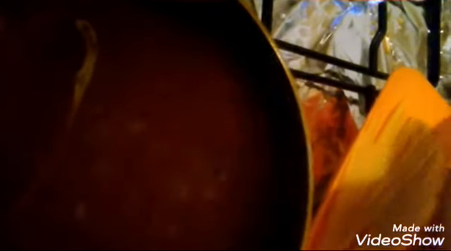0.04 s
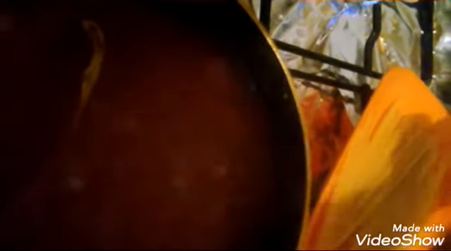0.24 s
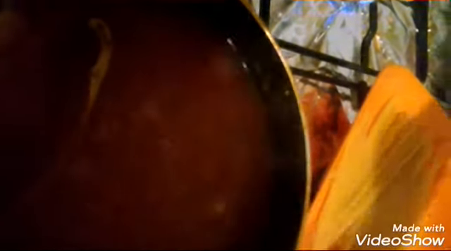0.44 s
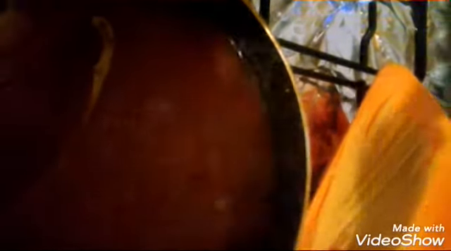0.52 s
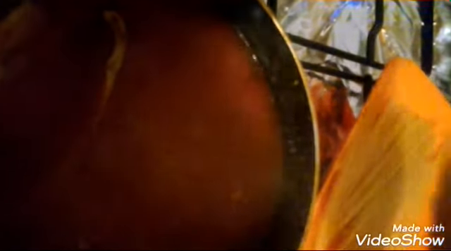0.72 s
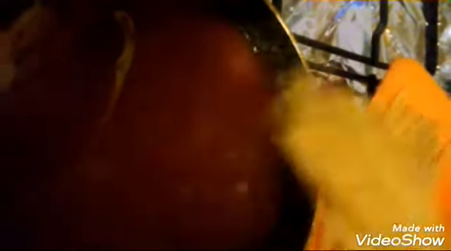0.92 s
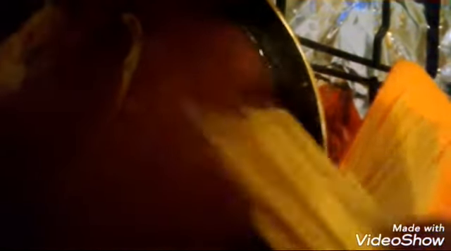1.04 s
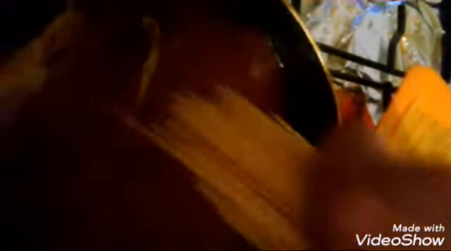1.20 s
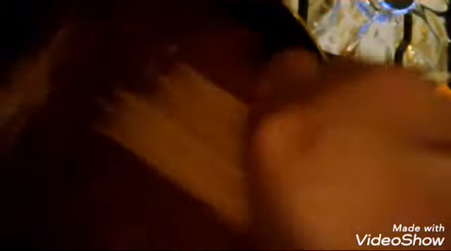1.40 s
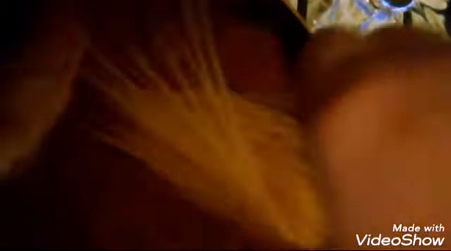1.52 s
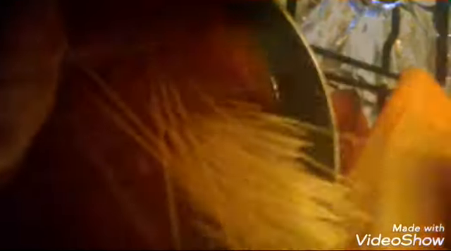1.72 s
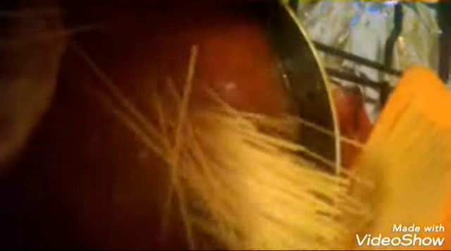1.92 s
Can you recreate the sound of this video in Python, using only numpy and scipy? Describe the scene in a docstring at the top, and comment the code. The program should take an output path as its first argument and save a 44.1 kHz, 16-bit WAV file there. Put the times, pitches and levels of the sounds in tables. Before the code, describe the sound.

Brittle cracks of dry spaghetti, then a sliding rustle, close up in a small kitchen.

```python
"""Dry spaghetti crackles in a few sharp bursts, close to a stereo pair of microphones beside a pot
on the stove in a small, hard-walled kitchen. The bundle then slides from its packet with a swelling
stick-slip rustle, and single strands tick against each other. Each click rings a strand and bounces
off the pot, the hob and the walls. Behind it all the stove hisses and hums faintly."""
import sys
import numpy as np
from scipy import signal
from scipy.fft import rfft, irfft
from scipy.io import wavfile
from scipy.ndimage import uniform_filter1d

SR = 44100
rng = np.random.default_rng(int(sys.argv[2]) if len(sys.argv) > 2 else 0)


def int16_out(signal):
    """Quantize to a 16-bit WAV file."""
    q = np.round(np.clip(np.atleast_2d(signal).T, -1, 1) * 32767)
    wavfile.write(sys.argv[1], SR, q.astype(np.int16))


N = 85995
T = np.arange(N) / SR

# Bursts of brittle cracks: start_s, crack_db, fade_s (to 1/e), crunch_db, knock_db, pan_db (+ is left)
CRACKLES = [(0.176, -62.5, .001, -87, -72, 3), (0.2083, -25.5, 0.0086, -34.5, -56.5, -4.5),
            (0.217, -28, 0.025, -43.5, -53.5, 1), (0.4113, -50, 0.0025, -59.5, -58, -3),
            (0.501, -40.5, .004, -61, -73, -4), (0.5106, -34.5, 0.0069, -64, -70, -4.5),
            (0.5157, -34, 0.045, -48, -55, 1.5), (0.5771, -36, 0.00094, -46, -43, -1),
            (.587, -27.5, 0.006, -57, -46, -4.5), (0.6003, -28, 0.023, -41.5, -47.5, 1),
            (0.6663, -42, 0.0022, -49.5, -56.5, 2.5)]
# The bundle sliding out: time_s, rustle_db, rattle_db
SLIDE_LEVELS = [(1.34, -65.5, -81), (1.385, -55.5, -64), (1.41, -52.5, -76), (1.465, -46.5, -65),
                (1.51, -39, -48.5), (1.53, -38, -51.5), (1.555, -36, -45.5), (1.605, -32, -52),
                (1.63, -51.5, -54.5), (1.70, -57, -61), (1.76, -52, -65.5), (1.805, -55.5, -64),
                (1.84, -74, -78), (1.94, -75, -79)]
# Single strands tapping: start_s, level_db, pitch_hz, knock_db, pan_db
TICKS = [(1.281, -55, 5670, -83, 0), (1.3932, -42, 5100, -78, 4), (1.509, -44, 5170, -51, -2),
         (1.5402, -37, 5060, -53, 3), (1.5495, -47, 5000, -46, -1), (1.568, -32.5, 5400, -53, 5),
         (1.592, -32, 5700, -74, 2), (1.5976, -33, 5520, -49.5, 5), (1.6075, -36.5, 5500, -46.5, 0),
         (1.675, -42, 5200, -80, -2)]
# Light bumps that leave something ringing: start_s, level_db, pitch_hz, unused, pan_db
BUMPS = [(0.4134, -47.5, 1375, -6, -6.5), (0.5762, -50, 983, 2, -1), (0.595, -53.5, 974, 2, -28),
         (1.512, -48.5, 900, 2, -6), (1.547, -42, 850, .06, -9), (1.556, -67, 231, -1, 0),
         (1.686, -68, 350, 8, 6), (1.6922, -44, 1780, 0.27, -4)]
# Two swells of a hollow resonance: time_s, level_db
HOLLOW_LEVELS = [(1.22, -91), (1.34, -71.5), (1.43, -73.5), (1.49, -89), (1.68, -79), (1.75, -63.5),
                 (1.82, -67), (1.92, -84.5)]
# The drift of the stove's hiss: time_s, level_db
STOVE_LEVELS = [(0, -63), (.4, -59), (.8, -61), (.92, -62.5), (1.13, -59.5), (1.3, -62.5), (1.95, -60)]
# Tone colour of each sound: frequency_hz, relative_level_db
CRACK_SPECTRUM = [(100, -73), (350, -64), (700, -32), (1800, -25), (2600, -20), (3300, -13), (4500, -5),
                  (5400, 4), (6200, -2), (7000, -10), (8000, -22), (11000, -26.5), (13000, -41),
                  (15000, -23.5)]
KNOCK_SPECTRUM = [(60, -15.5), (250, -31.5), (550, -34), (800, -1), (1000, 7), (1400, 5), (1800, 1.5),
                  (2600, 8), (4000, -24.5), (9000, -55)]
RUSTLE_SPECTRUM = [(100, -71.5), (700, -40.5), (1800, -22), (3000, -15), (4300, -9), (4900, -4.5),
                   (5300, 2.5), (5750, -5), (6600, -9.5), (8000, -28.5), (10500, -26.5), (13000, -50.5),
                   (15000, -23.5)]
RATTLE_SPECTRUM = [(60, -28), (170, -72.5), (250, -20), (340, -34), (480, -10.5), (700, -5), (850, -2),
                   (1100, -2.5), (1500, -4.5), (2300, 0), (4000, 0.5), (9000, -26)]
STOVE_SPECTRUM = [(30, -52), (120, -33.5), (200, -21.5), (380, -14), (600, -11.5), (850, -7), (1400, -12),
                  (1650, -3), (1950, 7), (2300, 0.5), (2900, -16.5), (3600, -12), (4000, -0.5),
                  (4300, -17.5), (4700, 3), (5200, -10.5), (5700, -7), (6600, -14), (8200, -29),
                  (15000, -49)]
# How alike the background is at the two microphones: frequency_hz, coherence (0 to 1)
MIC_COHERENCE = [(60, 0.9), (400, 0.31), (800, 0.48), (1400, 0.0067), (15000, .02)]
# Bounces off pot and hob, left microphone's row then right's: first_s, second_s, third_s
BOUNCE_DELAYS = [(.00009, .00025, .00052), (.00012, .00032, .00043)]

CRACKS_PER_S, CRACK_SPREAD_DB, FIRST_CRACK_DB = 1300, 3, 1
CREAK_DB, CREAK_S = -13.5, 0.0045
CRUNCH_HZ, CRUNCH_WIDTH_HZ = 3620, 930
GRAINS_PER_S, GRAIN_SPREAD_DB, SLIDE_PAN_DB = 1800, 2, -0.6
BRIGHT_HZ, BRIGHT_POWER, BRIGHT_DB = 7900, 0.68, 1
FLICKER_DB, FLICKER_HZ, HUM_HZ, HUM_DB = 1.5, 24.3, 194.5, -98
ROOM_T60_S, ROOM_DB, ROOM_BUILD_S = 0.27, -1, 0.0013
TREBLE_T60_S, TREBLE_HZ = 0.19, 8600


def crackling():
    """Brittle strands give way: each burst has a bright crack, a lower crunch and a hollow knock."""
    cracks, crunches, knocks = 0, 0, 0
    for start_s, crack_db, fade_s, crunch_db, knock_db, pan_db in CRACKLES:
        cracks += from_db(crack_db) * burst(start_s, fade_s) * panned(pan_db)
        body = burst(start_s, fade_s) * panned(pan_db)
        crunches += from_db(crunch_db) * body
        knocks += from_db(knock_db) * body
    for _ in range(2):
        crunches = resonance(crunches, CRUNCH_HZ, CRUNCH_WIDTH_HZ)
    keep_power = np.sqrt(2 * SR / (np.pi * CRUNCH_WIDTH_HZ))
    return coloured(cracks, CRACK_SPECTRUM) + keep_power * crunches + coloured(knocks, KNOCK_SPECTRUM)


def burst(start_s, fade_s, count=90):
    """Strands creak softly, crack once firmly, then crackle away in a dying run."""
    steps = np.arange(count) - count // 8  # step 0 is the firm crack
    delays = (steps + rng.random(count) * np.sign(steps)) / CRACKS_PER_S
    creak = from_db(CREAK_DB) * np.exp(-np.abs(delays) / CREAK_S)
    envelope = np.where(delays < 0, creak, np.exp(-np.abs(delays) / fade_s))
    accents_db = np.where(steps == 0, FIRST_CRACK_DB, CRACK_SPREAD_DB * rng.standard_normal(count))
    run = ringing_strands(start_s + delays, envelope * from_db(accents_db))
    return unit_energy(run) * np.sqrt(SR / 100)  # the energy of 10 ms at rms 1


def ringing_strands(times, sizes, count=10, low_hz=3750, high_hz=6430, ring_db=1):
    """Each click briefly rings one strand, and each strand has its own pitch."""
    out = 0
    struck = rng.integers(0, count, len(times))
    for strand, pitch_hz in enumerate(np.geomspace(low_hz, high_hz, count)):
        hits = clicks(times[struck == strand], sizes[struck == strand])
        out += hits + from_db(ring_db) * resonance(hits, pitch_hz, width_hz=174)
    return out


def clicks(times, sizes, lag_spread_s=.00025):
    """Clicks of random sign, each reaching one microphone slightly ahead of the other."""
    out = np.zeros((2, N))
    signs = rng.choice([-1, 1], len(times))
    lags = rng.standard_normal(len(times)) * lag_spread_s
    for mic, arrivals in zip(out, (times + lags / 2, times - lags / 2)):
        np.add.at(mic, np.clip((arrivals * SR).astype(int), 0, N - 1), sizes * signs)
    return out


def sliding():
    """Strands rub on each other and the packet, and a few tick out above the rustle."""
    rustle_gain, rattle_gain = gain_curves(SLIDE_LEVELS)
    rustle = rustle_gain * stick_slip() * panned(SLIDE_PAN_DB)
    rattle = rattle_gain * stick_slip() * panned(SLIDE_PAN_DB)
    # the rustle's top treble fades when it is quiet
    relative_level = rustle_gain / rustle_gain.max()
    low, high = split_bands(rustle, BRIGHT_HZ)
    rustle = low + high * from_db(BRIGHT_DB) * relative_level ** BRIGHT_POWER
    for start_s, level_db, pitch_hz, knock_db, pan_db in TICKS:
        tap = burst(start_s, fade_s=0.00086, count=7) * panned(pan_db)
        rustle += from_db(level_db) * resonance(tap, pitch_hz, width_hz=1140)
        rattle += from_db(knock_db) * tap
    rattle += from_db(1.5) * resonance(rattle, pitch_hz=835, width_hz=50)  # one hollow ring
    return coloured(rustle, RUSTLE_SPECTRUM) + coloured(rattle, RATTLE_SPECTRUM)


def stick_slip(count=16000):
    """Strands catch and let go in dense, uneven clicks, held near rms 1."""
    times = np.cumsum(rng.exponential(1, count)) / GRAINS_PER_S
    sizes = from_db(GRAIN_SPREAD_DB * np.minimum(rng.exponential(1, count), 4))
    grains = ringing_strands(times, sizes * (times < T[-1]))
    local_power = np.abs(uniform_filter1d(grains ** 2, size=900))
    return grains / np.sqrt(local_power + 1e-6)


def bumps(ring_cycles=50):
    """Each light bump rings one tone that builds in about a cycle and falls 60 dB over ring_cycles."""
    out = 0
    for start_s, level_db, pitch_hz, _, pan_db in BUMPS:
        cycles = np.maximum(T - start_s, 0) * pitch_hz
        envelope = from_db(level_db - 60 * cycles / ring_cycles) * (1 - np.exp(-cycles ** 2))
        out += panned(pan_db) * envelope * np.sin(2 * np.pi * cycles)
    return out


def hollow_resonance(band_hz=(448, 548)):
    """A narrow, low resonance swells softly while the bundle slides."""
    band = signal.butter(2, band_hz, "band", fs=SR, output="sos")
    return gain_curves(HOLLOW_LEVELS)[0] * rms_one(signal.sosfilt(band, diffuse_noise()))


def kitchen(sound):
    """Nearby metal scatters the direct sound; hard walls add a dense tail whose treble dies first."""
    low, high = split_bands(rng.standard_normal((2, N)), TREBLE_HZ)
    tail = low * from_db(-60 * T / ROOM_T60_S) + high * from_db(-60 * T / TREBLE_T60_S)
    tail *= 1 - np.exp(-T / ROOM_BUILD_S)
    direct = np.array([metal_bounces(mic, delays) for mic, delays in zip(sound, BOUNCE_DELAYS)])
    return direct + from_db(ROOM_DB) * signal.fftconvolve(sound, unit_energy(tail), axes=1)[:, :N]


def metal_bounces(sound, delays, strength=0.56):
    """Bounces off pot and hob smear a crack over a few milliseconds without colouring it."""
    for delay_s in delays:
        feedback = np.r_[1, np.zeros(int(delay_s * SR)), strength]
        sound = signal.lfilter(feedback[::-1], feedback, sound)  # all-pass
    return sound


def stove():
    """The stove in the background: a soft, flickering hiss, and a faint hum off to the left."""
    flicker = np.interp(T * FLICKER_HZ, np.arange(N), rng.standard_normal(N))
    gain = gain_curves(STOVE_LEVELS)[0] * from_db(FLICKER_DB * flicker)
    hiss = gain * coloured(diffuse_noise(), STOVE_SPECTRUM) * panned(pan_db=0.05)
    hum = from_db(HUM_DB) * rms_one(np.sin(2 * np.pi * HUM_HZ * T)) * panned(pan_db=12.5)
    return hiss + hum


def diffuse_noise():
    """White noise from all round the room, most alike at the two microphones in the bass."""
    mid, side = rfft(rng.standard_normal((2, 2 * N)))
    coherence = per_bin(MIC_COHERENCE)
    spectra = np.sqrt(1 + coherence) * mid + np.sqrt(1 - coherence) * side * [[1], [-1]]
    return rms_one(irfft(spectra)[:, :N])


def resonance(x, pitch_hz, width_hz):
    """Two-pole resonance with gain 1 at its peak."""
    radius = np.exp(-np.pi * width_hz / SR)
    feedback = [1, -2 * radius * np.cos(2 * np.pi * pitch_hz / SR), radius ** 2]
    return signal.lfilter(np.array([1, 0, -1]) * (1 - radius ** 2) / 2, feedback, x + 1e-18)


def coloured(x, spectrum):
    """Minimum-phase filter of the given colour that keeps the power of white noise."""
    cepstrum = irfft(np.log(rms_one(from_db(per_bin(spectrum)))))
    cepstrum[1:N] *= 2
    cepstrum[N + 1:] = 0
    return irfft(rfft(x, 2 * N) * np.exp(rfft(cepstrum)))[:, :N]


def split_bands(x, crossover_hz):
    """The sound below and above a crossover."""
    return [signal.sosfilt(signal.butter(5, crossover_hz, kind, fs=SR, output="sos"), x)
            for kind in ("low", "high")]


def per_bin(points):
    """A table over log frequency, read on the padded FFT grid."""
    hz, values = np.transpose(points)
    bin_hz = np.arange(N + 1) * SR / (2 * N)
    return np.interp(np.log(bin_hz + 1), np.log(hz), values)


def gain_curves(rows):
    """Gain over time for each dB column."""
    times, *columns = np.transpose(rows)
    return [from_db(np.interp(T, times, levels_db)) for levels_db in columns]


def panned(pan_db):
    """Left and right gains, pan_db apart."""
    return from_db(np.array([[.5], [-.5]]) * pan_db)


def from_db(db):
    """Decibels to gain."""
    return 10 ** (np.asarray(db) / 20)


def rms_one(x):
    """Scale to rms 1."""
    return x / np.sqrt(np.mean(x ** 2) + 1e-20)


def unit_energy(x):
    """Scale each channel to energy 1."""
    return x / np.sqrt(np.sum(x ** 2, axis=-1, keepdims=True) + 1e-20)


def scene():
    """The pasta up close in the kitchen, with the stove behind it."""
    return kitchen(crackling() + sliding() + bumps()) + hollow_resonance() + stove()


def record(dry, cutoff_hz=15700):
    """Both microphone channels lose their very top to a steep low-pass."""
    return signal.sosfilt(signal.ellip(10, .2, 80, cutoff_hz, fs=SR, output="sos"), dry)


dry = scene()
out = record(dry)
int16_out(out)
```